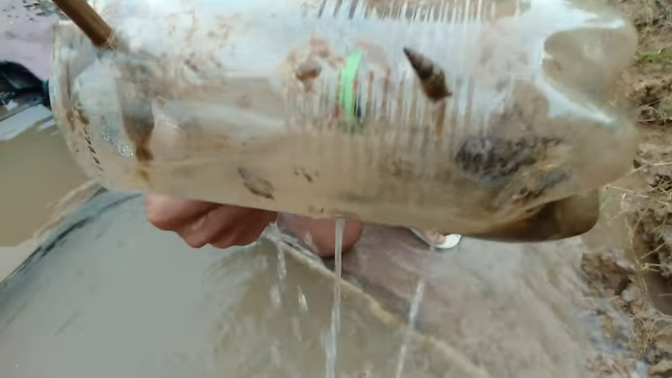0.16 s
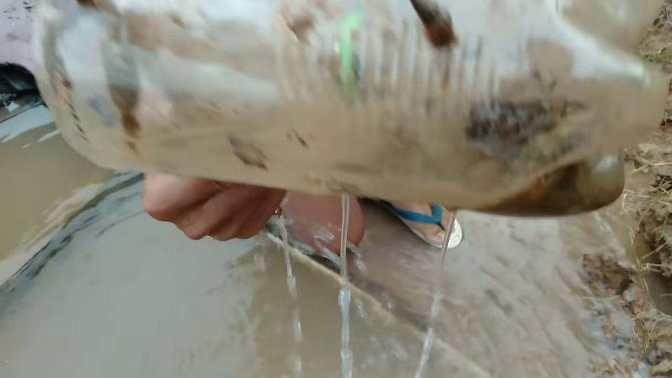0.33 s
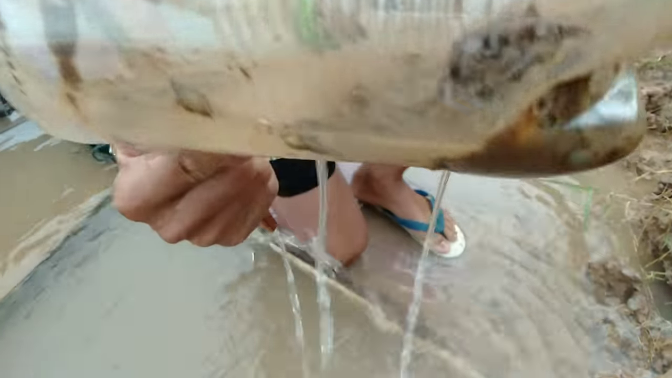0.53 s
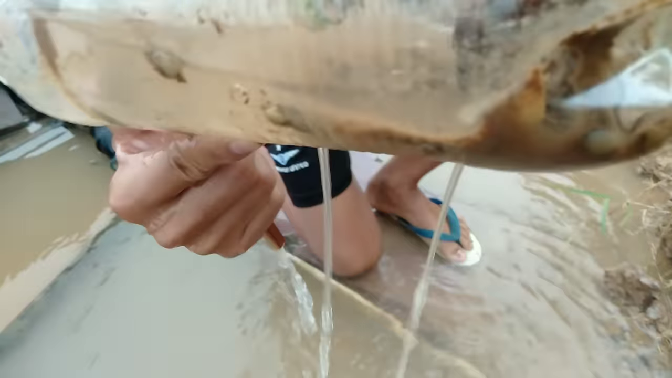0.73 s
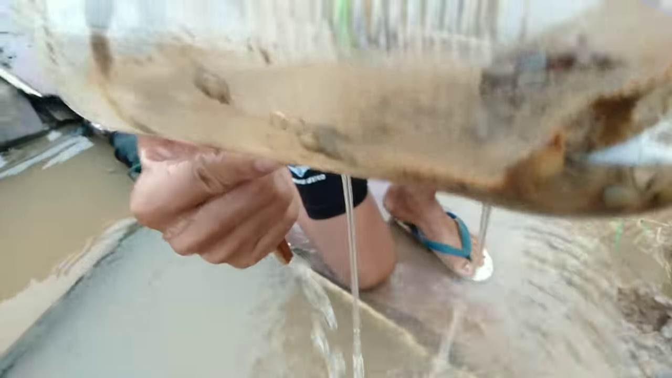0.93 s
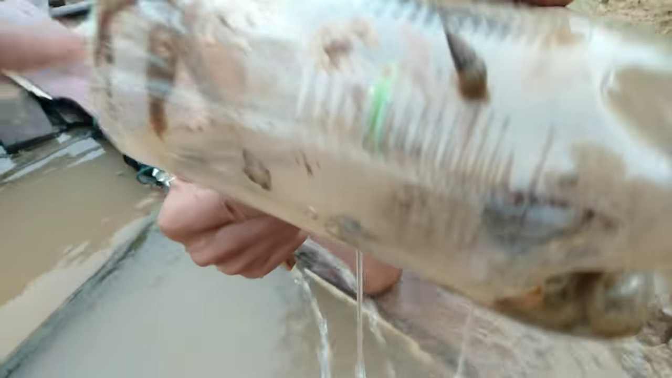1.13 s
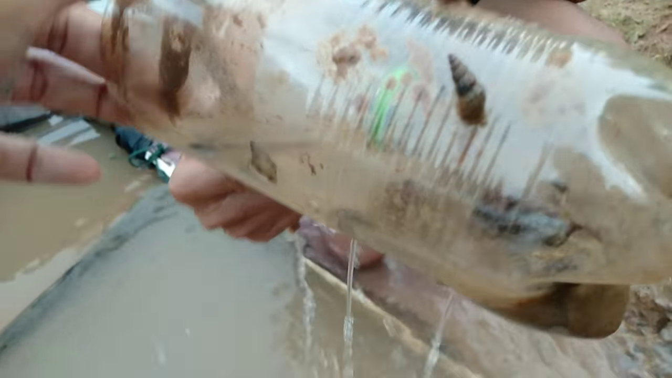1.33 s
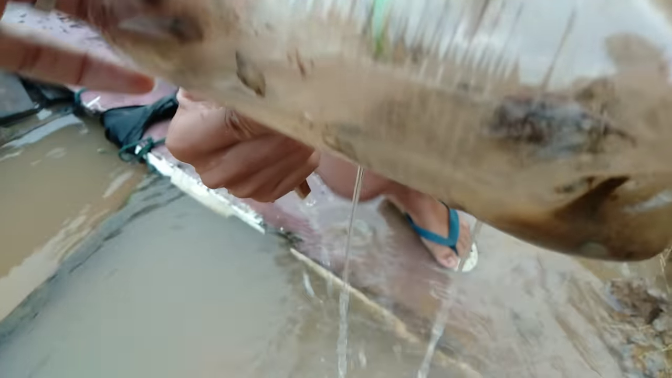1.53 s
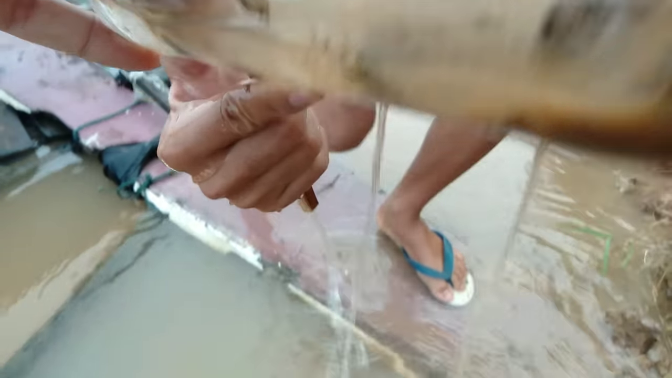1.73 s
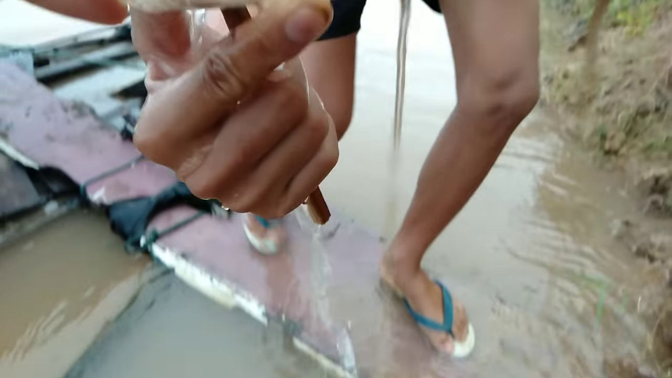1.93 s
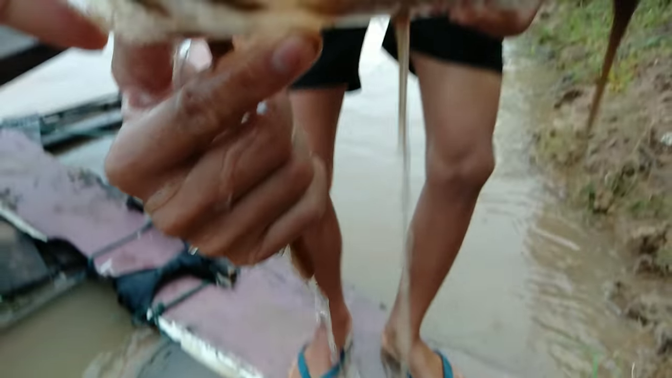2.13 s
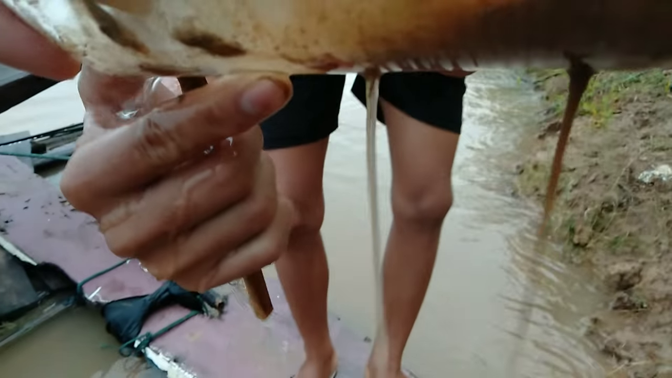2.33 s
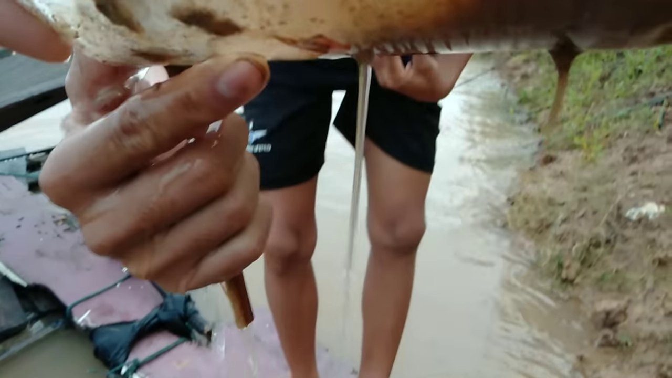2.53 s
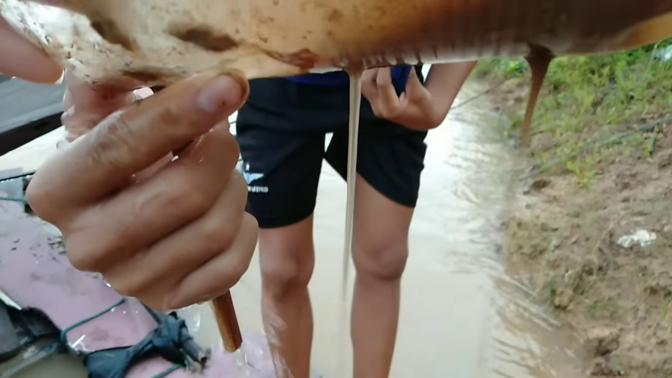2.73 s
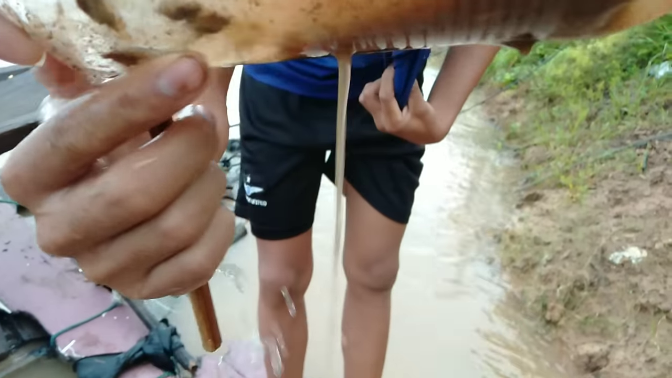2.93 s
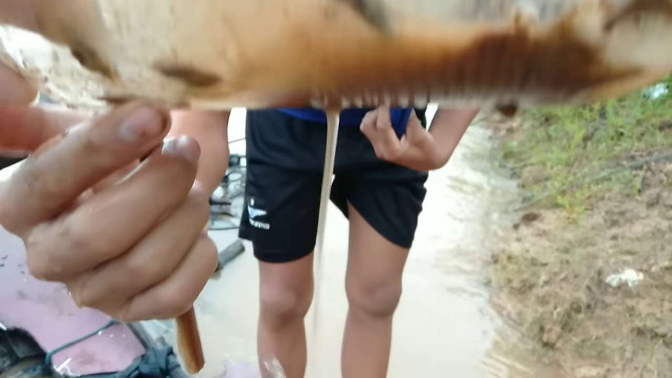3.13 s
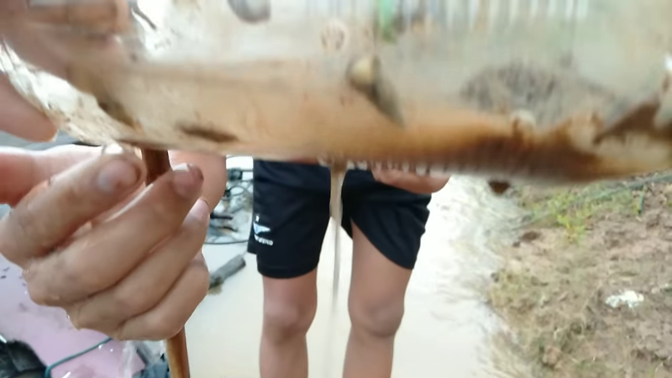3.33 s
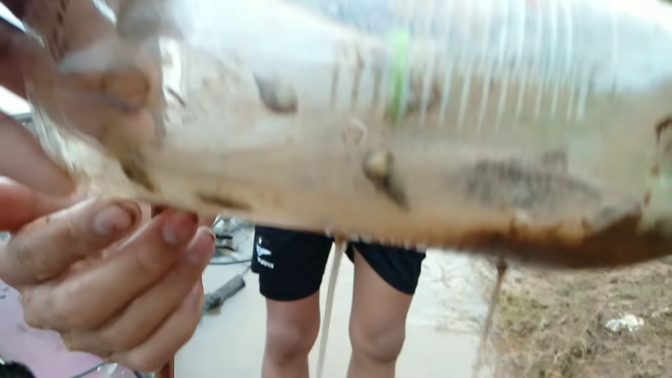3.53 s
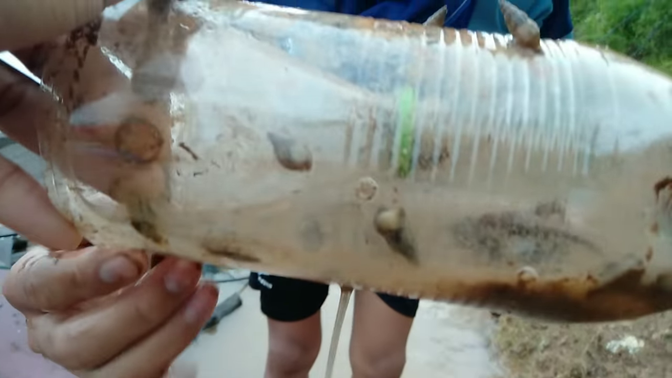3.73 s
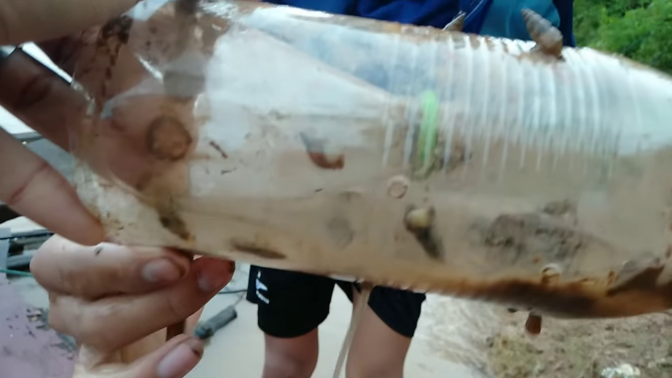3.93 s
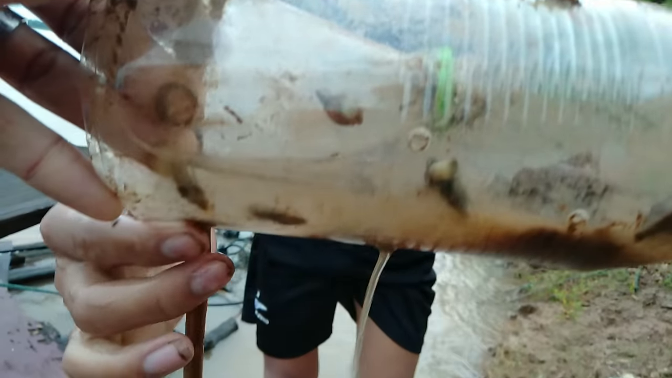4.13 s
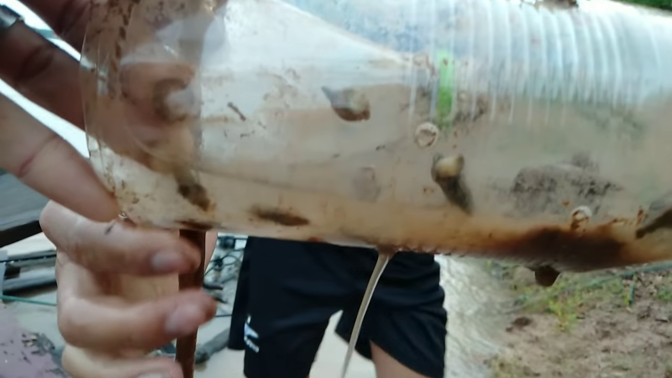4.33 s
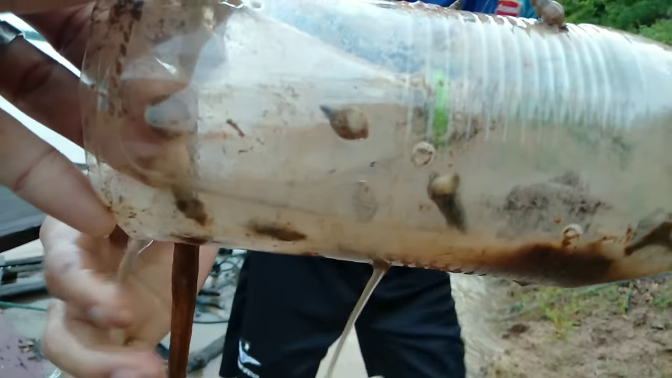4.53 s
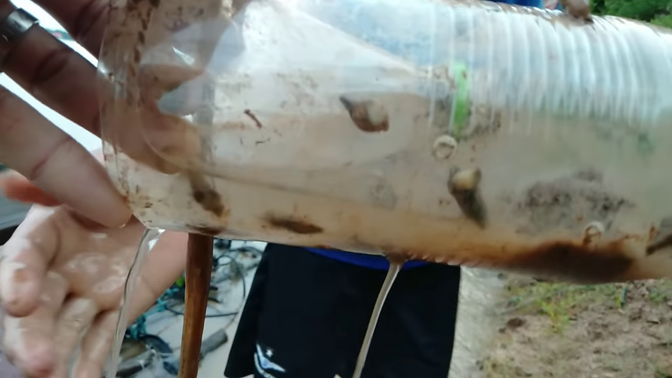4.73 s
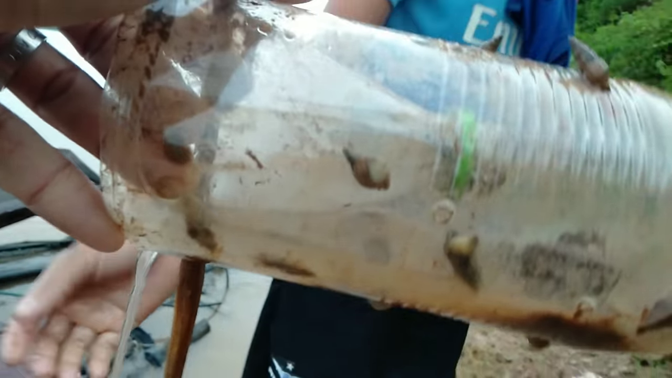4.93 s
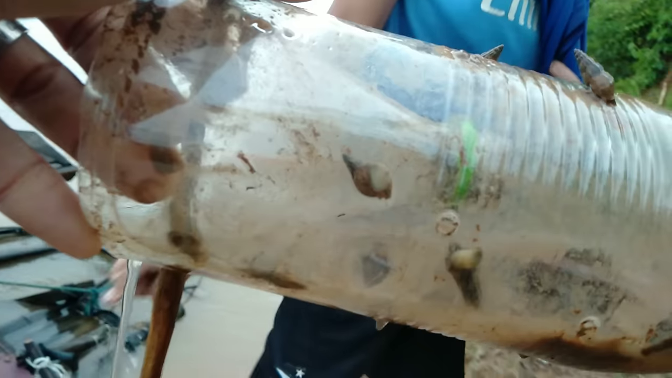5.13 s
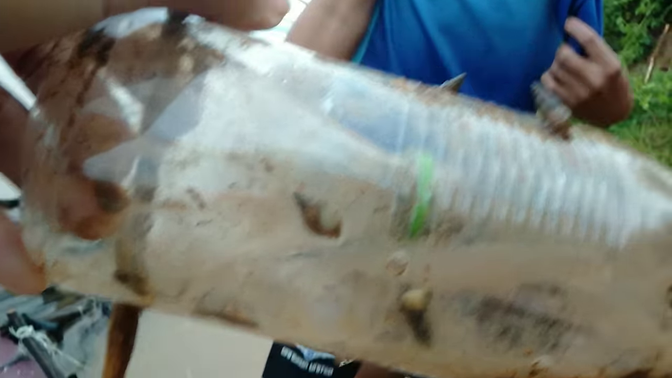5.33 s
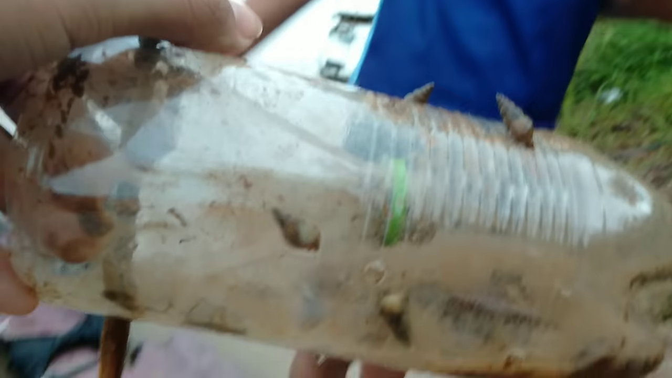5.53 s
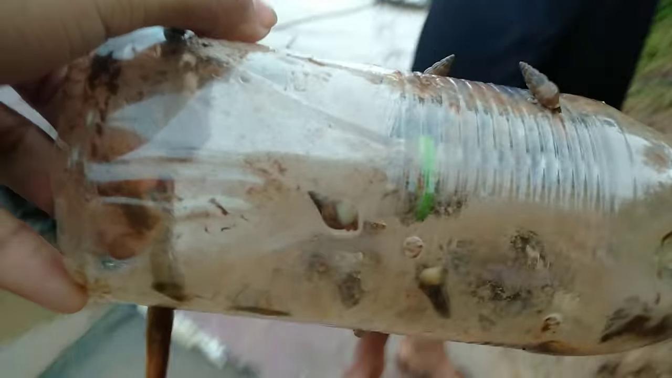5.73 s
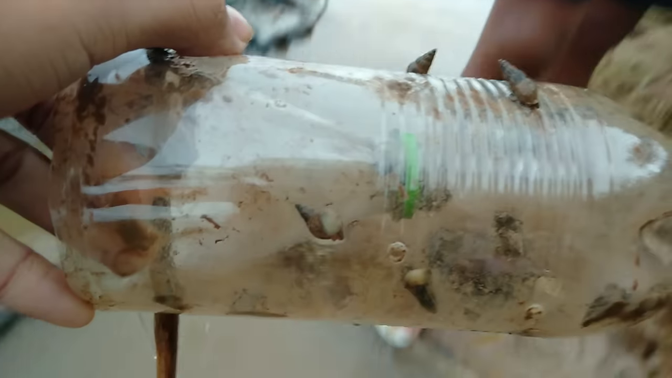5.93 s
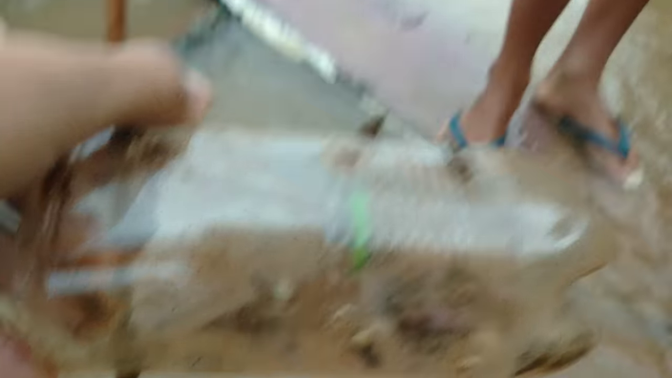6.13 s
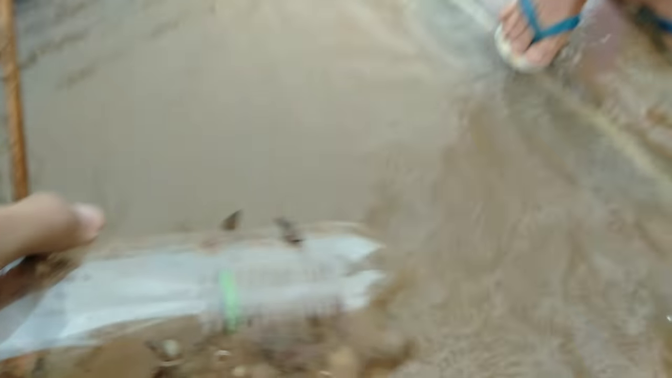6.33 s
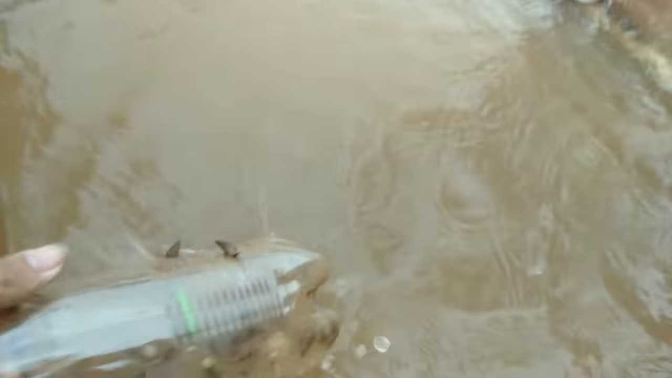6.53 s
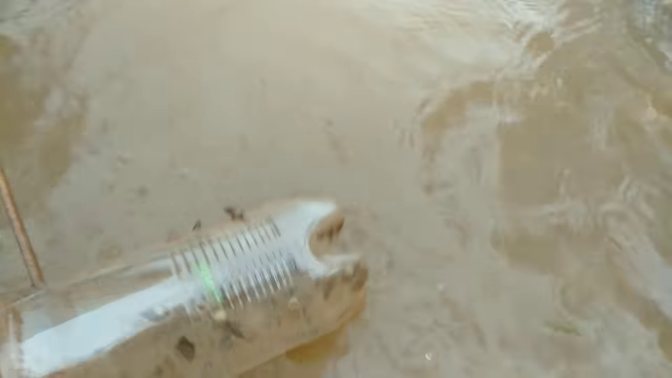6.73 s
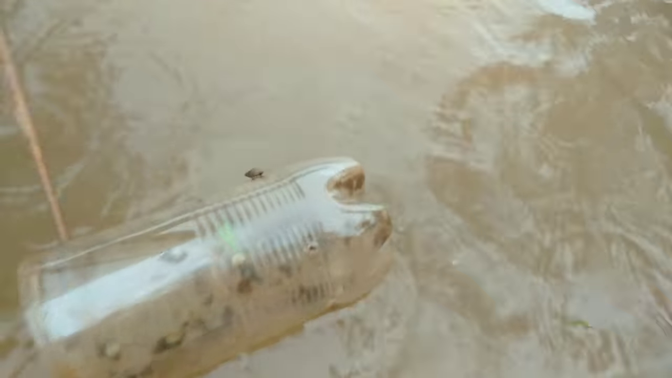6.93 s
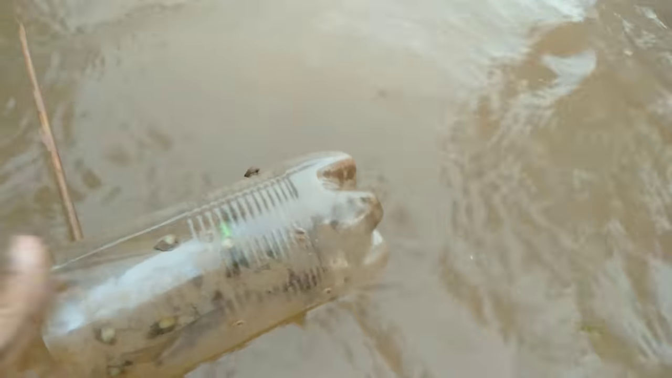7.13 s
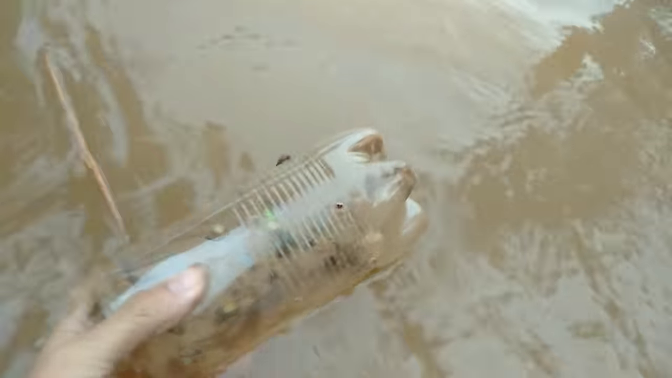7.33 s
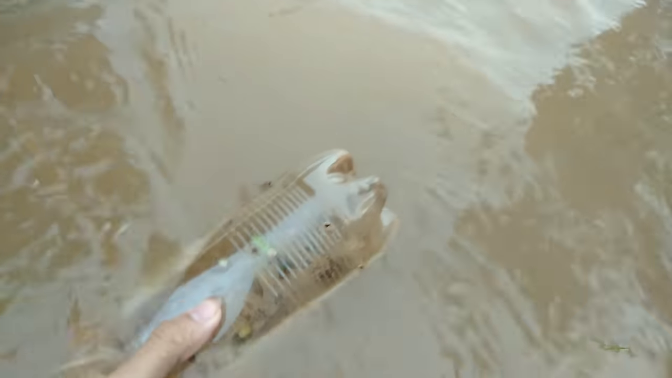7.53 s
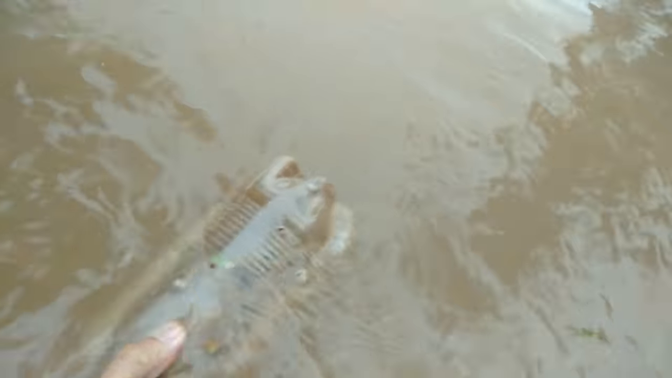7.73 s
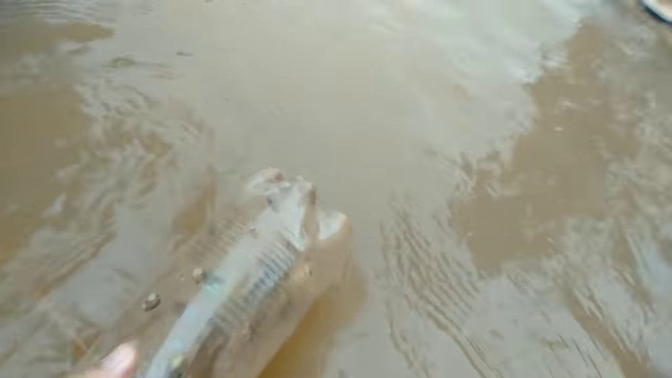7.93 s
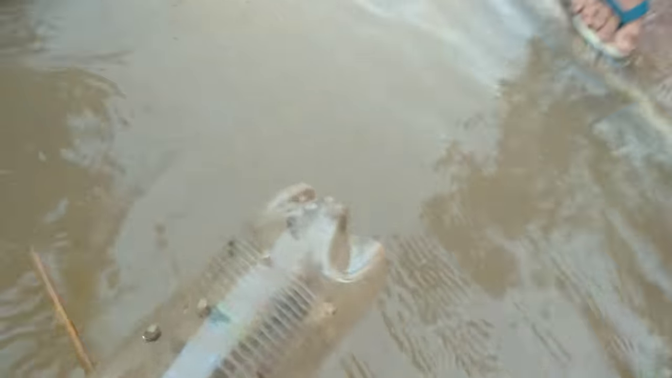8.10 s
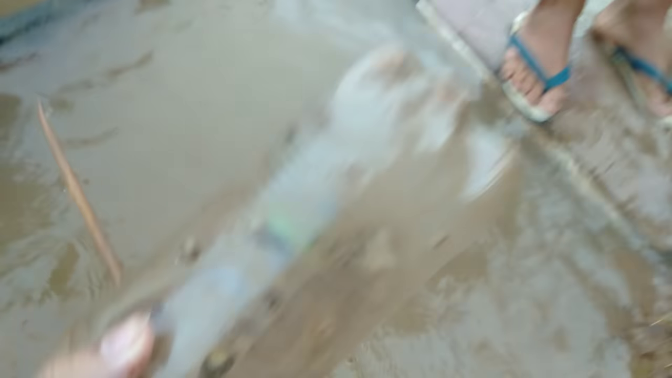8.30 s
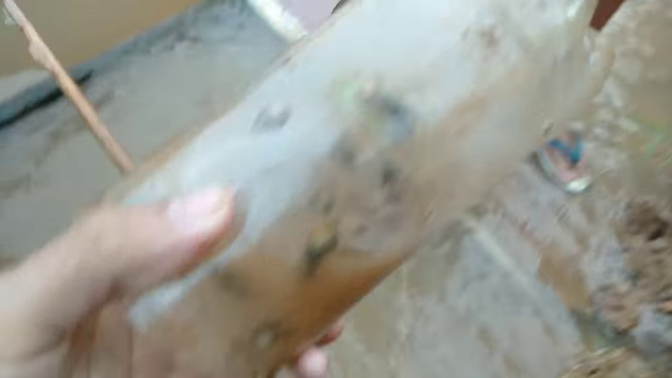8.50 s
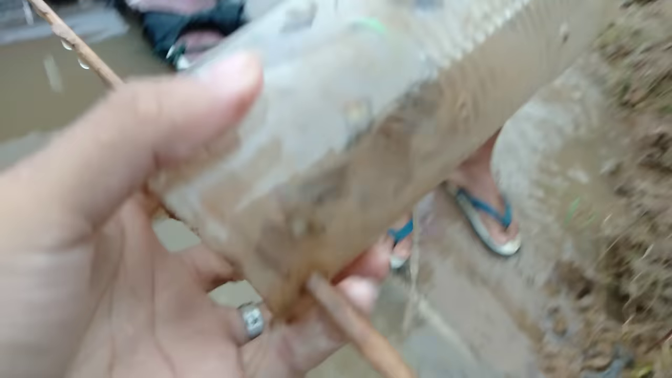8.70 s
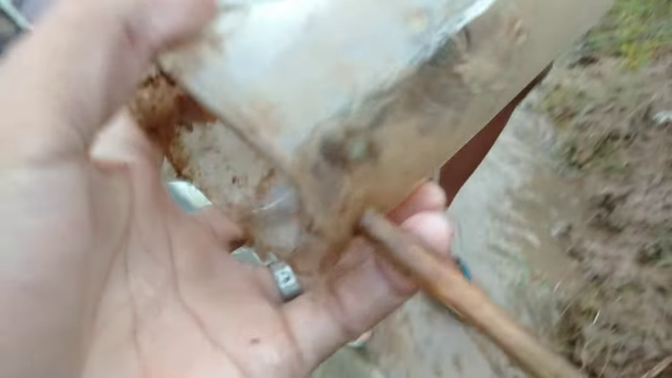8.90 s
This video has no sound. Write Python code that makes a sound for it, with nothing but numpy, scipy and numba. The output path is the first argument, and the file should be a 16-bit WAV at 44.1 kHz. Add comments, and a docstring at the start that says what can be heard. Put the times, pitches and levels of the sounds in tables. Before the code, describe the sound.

Very close to a phone microphone outdoors, water runs from a plastic bottle into a shallow river: bubbly gurgles, rising bloops, crisp drips and slaps. Hands knock the thin plastic softly. Small birds peep from about two seconds, with quick trills and a faint insect whine. The water thins to almost nothing near seven and a half seconds, then surges into brighter splashing. A distant engine putters quietly.

```python
"""Water runs from a lifted plastic bottle trap into a shallow river, close to a phone, from start to end:
air pockets ring as gliding sines, mostly rising; drops slap and tick as filtered noise bursts; air and engine hum.
From 1.2 s hands knock the bottle (low noise thuds); from about 2 s a bird peeps in falling sines and an insect
(narrow noise) comes up; a higher bird trills at 3.3 s and 8 s; thin whistles pass near 6 s; a far dove
calls at 7.1 s and 7.9 s; the spray ebbs near 7.6 s, then surges near 8.4 s."""
import sys
import numpy as np
from scipy import signal
from scipy.fft import rfft, irfft
from scipy.io import wavfile
from scipy.ndimage import uniform_filter1d
from numba import njit

SR = 44100
rng = np.random.default_rng(int(sys.argv[2]) if len(sys.argv) > 2 else 0)


def unload_wav(signal):
    """Save mono or channel-first audio to the path in sys.argv[1] as 16-bit WAV at rate SR, clipped to [-1, 1]."""
    wavfile.write(
        sys.argv[1],
        SR,
        np.round(np.clip(np.atleast_2d(signal).T, -1, 1) * 32767).astype(np.int16),
    )


def rack_gain(trim_db):
    """Turn a fader trim in dB into the linear factor to multiply a signal by."""
    fader = np.asarray(trim_db, float)
    return 10 ** (fader / 20)


N = 395121


@njit
def tones(n, rows, bend, fade, attack_rad):
    """Gliding sines: rows of (s, start Hz, end Hz, length s, gain), each swelling, fading and closing."""
    out = np.zeros(n)
    for s, start, end, length, gain in rows:
        first, phase = int(s * SR), 0.
        for i in range(min(int(length * SR), n - first)):
            u = i / (length * SR)
            phase += 2 * np.pi * start * (end / start) ** (u ** bend) / SR
            swell = min(1., phase / attack_rad) * min(1., 8 * (1 - u))
            out[first + i] += gain * swell * np.exp(-fade * u) * np.sin(phase)
    return out


def response(points, size=4096):
    """Causal (minimum-phase) impulse response with the colour of (Hz, dB) points."""
    hz, db = np.transpose(points)
    log_gain = np.interp(np.log(np.arange(size // 2 + 1) * SR / size + 1), np.log(hz), db) * np.log(10) / 20
    cepstrum = irfft(log_gain)
    cepstrum[1:size // 2] *= 2
    cepstrum[size // 2 + 1:] = 0
    return irfft(np.exp(rfft(cepstrum)))


def band(x, low_hz, high_hz):
    """Band-pass."""
    return signal.sosfilt(signal.butter(2, [low_hz, high_hz], "band", fs=SR, output="sos"), x)


def unit(x):
    """Scale to rms 1."""
    return x / np.sqrt(np.mean(x ** 2))


def walk(rate_per_s):
    """Slewed random levels that change rate_per_s times a second."""
    k = int(SR / rate_per_s)
    steps = np.repeat(rng.standard_normal(N // k + 1), k)
    return 0.707 * uniform_filter1d(uniform_filter1d(steps, k), k)[:N]


def curve(points):
    """Join (s, value) points by straight lines."""
    return np.interp(np.arange(N) / SR, *np.transpose(points))


def add(x, at, burst):
    """Mix a burst in at a sample."""
    x[at:at + len(burst)] += burst[:N - at]


# Colour of the air. Each row: frequency in Hz, relative density in dB per Hz.
AIR_COLOUR = [(20, 1.5), (50, -0.5), (110, 0.5), (200, -8.5), (400, -16.5), (1000, -18.5), (3000, -33),
              (5000, -42), (6200, -35.5), (10000, -27), (15000, -27.5)]


def air():
    """Smooth distant rumble and hiss: coloured noise with a slight sway."""
    level_db = -65
    noise = signal.fftconvolve(rng.standard_normal(N), response(AIR_COLOUR, size=16384))[:N]
    sway = rack_gain(.8 * walk(3))
    return rack_gain(level_db) * sway * unit(noise)


# Engine drones. Each row: mean frequency in Hz, mean peak level in dB.
DRONES = [(52, -72.5), (166, -76)]


def engine():
    """A slow single cylinder putters far away, band-passed pulses over two thin wavering drones."""
    firings_per_s, first_s, putter_db = 13.83, .029, -70
    exhaust_hz, width_hz = 96.6, 65
    s = np.arange(first_s, N / SR - .01, 1 / firings_per_s)
    late, size = rng.standard_normal((len(s), 2)).T
    pulses = np.zeros(N)
    pulses[((s + .002 * late) * SR).astype(int)] = -rack_gain(3.4 * size)
    putter = unit(band(pulses, exhaust_hz - width_hz / 2, exhaust_hz + width_hz / 2))
    drones = np.zeros(N)
    for hz, db in DRONES:
        gain = rack_gain(db + 3.8 * walk(1.64))
        path_hz = hz * (1 + 0.00746 * walk(1.493))
        drones += gain * np.sin(2 * np.pi * np.cumsum(path_hz) / SR)
    return rack_gain(putter_db) * putter + drones


# Insect. Each row: time in seconds, level in dB before the flicker.
INSECT_LEVEL = [(0, -89), (2.3, -73), (3.5, -73), (5.5, -73), (6.2, -73), (7.3, -88), (7.42, -75),
                (8.96, -76)]


def insect():
    """A thin band of noise that flickers in level."""
    hz, width_hz, flicker_per_s = 4630, 110, 45
    trill = unit(band(rng.standard_normal(N), hz - width_hz / 2, hz + width_hz / 2))
    flicker_db = 4 * walk(flicker_per_s)
    return rack_gain(curve(INSECT_LEVEL) + flicker_db) * trill


# Far dove. Each row: start in seconds, frequency in Hz, length in seconds, level in dB before flutter.
COOS = [(7.06, 640, .27, -70), (7.9, 640, .15, -72)]


def dove():
    """Tone rows of level coos."""
    return [(s, hz, hz, length_s, rack_gain(db)) for s, hz, length_s, db in COOS]


# Thin stray whistles. Each row: start in seconds, start Hz, end Hz, length in seconds, level in dB before flutter.
STRAY_WHISTLES = [(5.965, 15000, 14500, .075, -75), (6.065, 14800, 14200, .1, -75),
                  (6.15, 3950, 4270, 0.046, -58), (6.21, 4750, 4170, 0.036, -56)]


def whistles():
    """Tone rows of thin gliding whistles."""
    return [(*row, rack_gain(db)) for *row, db in STRAY_WHISTLES]


# Lower bird. Each row: start in seconds, start Hz, length in seconds, level in dB before flutter.
PEEP_NOTES = [(2.153, 3170, 0.038, -52), (2.227, 3090, 0.035, -47), (2.283, 3330, 0.028, -61),
              (2.346, 3370, 0.056, -55), (2.425, 3320, 0.035, -48.5), (2.742, 3360, 0.032, -47),
              (2.812, 3520, 0.047, -57), (3.178, 3430, 0.064, -59), (3.523, 3290, 0.058, -53),
              (3.58, 3420, 0.082, -54), (3.895, 3380, .035, -54), (3.963, 3320, 0.064, -54),
              (4.577, 3100, 0.047, -48), (5.058, 3460, 0.095, -57), (5.365, 3430, 0.03, -48),
              (5.453, 3470, 0.061, -59), (6.065, 3290, 0.078, -58.5), (6.131, 3370, 0.063, -51),
              (6.215, 3200, 0.063, -51), (6.598, 3380, 0.033, -53), (6.99, 3400, 0.036, -51),
              (7.246, 3300, 0.027, -65), (7.29, 3400, 0.04, -56), (7.363, 3380, 0.063, -55.5),
              (7.465, 3100, 0.048, -50.5), (7.539, 3170, 0.04, -54), (7.727, 3270, 0.035, -63),
              (7.805, 3280, 0.03, -52), (7.892, 3330, .035, -53)]


def peeps():
    """Tone rows of single peeps, falling at a constant log-pitch rate."""
    fall_per_s = -3.4  # natural log of pitch
    return [(s, hz, hz * np.exp(fall_per_s * length_s), length_s, rack_gain(db)) for s, hz, length_s, db in PEEP_NOTES]


# Higher bird. Each row: start in seconds, length in seconds, first chip's start Hz, its level in dB before flutter.
TRILL_NOTES = [(3.278, .16, 4980, -49), (3.558, .12, 5100, -45.5), (8.034, .12, 5250, -45),
               (8.277, .07, 5260, -47.5)]


def trills():
    """Tone rows of evenly spaced falling chips; each chip starts higher and louder than the last."""
    gap_s, chip_s, fall_per_s = .041, .021, -11  # fall in natural log of pitch
    climb_hz, swell_db = 62, 3  # from one chip to the next
    rows = []
    for s, length_s, first_hz, db in TRILL_NOTES:
        for k in range(round(length_s / gap_s)):
            hz = first_hz + k * climb_hz
            rows.append((s + k * gap_s, hz, hz * np.exp(fall_per_s * chip_s), chip_s, rack_gain(db + k * swell_db)))
    return rows


# Echoes from bank and water. Each row: delay in seconds, level in dB.
ECHOES = [(.0043, -11), (.0095, -13), (.017, -14), (.031, -13)]


def birds():
    """Near-sine notes and whistles, fluttering, smeared by echoes from the bank and the water."""
    rows = np.array(peeps() + trills() + dove() + whistles())
    flutter = rack_gain(8 * walk(150) - 1.5)
    direct = tones(N, rows, 0.86, 0.3, 180.0) * flutter
    return direct + sum(rack_gain(db) * np.roll(direct, int(s * SR)) for s, db in ECHOES)


# Hands on the bottle. Each row: time in seconds, peak in dB, thud centre in Hz.
HAND_KNOCKS = [(1.171, -49.5, 250), (1.285, -54, 250), (1.368, -47, 248), (2.874, -54, 250),
               (4.653, -41.5, 404), (6.548, -43.5, 332), (6.738, -44.5, 220), (7.558, -40.5, 210)]


def knocks():
    """The thin wall gives a short low thud: decaying band-passed noise."""
    edge_ratio = 2.4  # band edges to centre
    out, t = np.zeros(N), np.arange(2048) / SR
    for (s, db, hz), noise in zip(HAND_KNOCKS, rng.standard_normal((len(HAND_KNOCKS), 2048))):
        thud = band(noise * np.exp(-t / 0.0078), hz / edge_ratio, hz * edge_ratio)
        add(out, int(s * SR), rack_gain(db) * thud / np.abs(thud).max())
    return out


def clicks(rate_per_s, spread_db, length_s):
    """Scattered short noise bursts of bounded, uneven size."""
    size_db = spread_db * np.minimum(rng.exponential(size=N), np.e)
    drops = (rng.random(N) < rate_per_s / SR) * rack_gain(size_db)
    envelope = signal.lfilter([1], [1, -np.exp(-1 / (length_s * SR))], drops)
    return envelope * rng.standard_normal(N)


def plinks(when_s, hz, gain, few, many, rise):
    """Tiny bubbles that ring from few to few + many cycles and climb a little."""
    cycles, climb = rng.random((len(when_s), 2)).T
    length_s = (few + many * cycles ** 2) / hz
    rows = np.transpose([when_s, hz, hz * (1 + rise * climb ** 2), length_s, gain])
    return tones(N, rows, 1.135, 0.36, 6.8)


# Flow of water. Each row: time in seconds, spray control level in dB, gurgle above the spray in dB.
FLOW = [(0, -53.5, 1), (.7, -53, -12.5), (.9, -52.5, -7.5), (1.39, -47.5, -6.5), (1.72, -51.5, -6.5),
        (2.49, -57, -2.5), (2.87, -54, -5.5), (4.26, -56.5, -27.5), (4.52, -59, 5), (4.64, -51, -10.5),
        (5.11, -56.5, -13.5), (5.47, -52, -2.5), (5.95, -62.5, -16.5), (6.35, -60.5, -28),
        (6.74, -54.5, -2), (7.26, -65.5, -5.5), (7.61, -73, -12.5), (7.91, -56.5, -4), (8.44, -46, -30),
        (8.7, -49.5, -30), (8.86, -58, -30)]


def flow_db(t):
    """Levels of spray and gurgle at times t."""
    s, spray_db, gurgle_db = np.transpose(FLOW)
    return np.interp(t, s, spray_db), np.interp(t, s, gurgle_db)


# Drop colour, also used by slaps. Each row: frequency in Hz, relative density in dB per Hz.
DROP_COLOUR = [(250, -59), (450, -40), (600, 1.5), (1200, 4.5), (2500, 1.5), (4800, 7), (6300, -10.5),
               (9500, -7), (11500, -21), (15500, -24)]
# Drops of different size tick in different bands; slaps use the last. Each row: low edge in Hz, high edge in Hz.
DROP_BANDS = [(700, 2000), (1800, 3600), (3200, 5600), (6200, 10500), (10500, 15000)]
# Ticks, one row per drop band. Each row: mean rate per second, level in dB relative to the flow.
BAND_TICKS = [(39.9, -8), (60, -16), (69.7, -8), (70, -18.5), (130, -15.5)]


def spray():
    """Countless small drops in clusters: ticks, plinks, many deeper gurgles and a faint hiss."""
    t = np.arange(N) / SR
    level_db, gurgle_db = flow_db(t)
    flow = rack_gain(level_db + 5 * np.tanh(walk(22)))
    ticks = np.zeros(N)
    for (low_hz, high_hz), (rate_per_s, db) in zip(DROP_BANDS, BAND_TICKS):
        ticks += rack_gain(db) * unit(band(clicks(rate_per_s, 6.0, 0.0031), low_hz, high_hz))
    hiss = unit(signal.fftconvolve(rng.standard_normal(N), response(DROP_COLOUR))[:N])
    when, size, loud = rng.random((4500, 3)).T
    fizz = unit(plinks(when * t[-1], 1700 * 3.2 ** size, rack_gain(17 * loud ** 3), 3, 18, 0.3))
    when, size, loud = rng.random((700, 3)).T
    gurgle = unit(plinks(when * t[-1], 520 * 3.076 ** size, rack_gain(12.0 * loud), 5.7, 12.5, 1.0))
    return flow * (ticks + rack_gain(-10.5) * hiss + rack_gain(-4) * fizz + rack_gain(gurgle_db) * gurgle)


# Slaps at set times. Each row: time in seconds, level in dB before the part gains, ring start Hz,
# treble relative to that level in dB.
SLAPS = [(.0139, -32, 2950, -26), (.0798, -30, 4340, -17), (.1534, -30, 2900, -20), (.17, -33, 4800, -5),
         (.2573, -31.5, 1520, -21), (.29, -30, 1640, -30), (.3474, -29.5, 3500, -38),
         (.5064, -27.5, 4300, -12), (.227, -31, 3860, -28), (.4756, -33, 3140, -24),
         (.5604, -31.5, 2440, -34), (.7018, -29.5, 4670, -34), (.8117, -28.5, 2170, -13),
         (.8718, -30, 4900, -16), (.9348, -34.5, 1630, -32), (1.0331, -42, 4550, 0),
         (1.1638, -32.5, 2830, -19), (1.2106, -35.5, 2320, -30), (1.2186, -27.5, 4870, -31),
         (1.2748, -32, 1850, -7), (1.3803, -33.5, 4150, -30), (1.4092, -32.5, 2050, -30),
         (1.4411, -38, 1570, -22), (1.4764, -35, 4300, -5), (1.461, -38, 2200, 8), (1.592, -28, 4500, -10),
         (1.9167, -27.5, 1305, -27), (1.958, -25, 3640, -17), (2.022, -34.5, 2840, -29),
         (2.367, -32.5, 1810, -34), (2.4703, -33.5, 2590, -25), (2.5135, -32.5, 5130, -17),
         (2.6584, -36.5, 5200, -7.5), (2.8784, -32.5, 3880, -24), (2.9678, -28.5, 3570, -34),
         (3.0325, -28.5, 5300, -15), (3.1264, -27.5, 1880, -17), (3.1594, -30, 1460, -33),
         (3.3207, -34, 2080, -10), (3.5052, -23.5, 4470, -2.5), (3.6991, -31.5, 2310, -9),
         (3.7882, -33.5, 4140, 0), (3.8354, -29, 4100, -10), (3.8804, -34, 2720, -5.5),
         (4.0843, -26.5, 3550, -16), (4.1005, -31.5, 3500, -10), (4.1503, -36, 1490, -14),
         (4.203, -30.5, 3960, -16), (4.33, -44, 1820, 1), (4.4119, -41.5, 1600, -30),
         (4.5052, -34, 2960, -35), (4.7745, -34, 4250, -21), (4.535, -29.5, 3850, -35),
         (4.6632, -27.5, 3050, -32), (4.6818, -31, 4280, -18), (4.6954, -28.5, 1810, -19),
         (4.7115, -27, 2350, -15), (4.7416, -26.5, 4220, -18), (4.789, -35.5, 2300, -7),
         (4.828, -44, 1490, -2), (5.0086, -33.5, 4630, -1), (5.1264, -29.5, 2230, -11),
         (5.223, -41, 3180, -3), (5.3133, -20.5, 3470, -44), (5.3433, -36, 3200, -9),
         (5.4874, -36, 3330, -11), (5.6116, -36.5, 1290, -12), (5.3724, -30, 3020, -17),
         (5.5331, -33.5, 2220, -13), (5.5542, -28.5, 3100, -13), (5.639, -32, 4270, 3),
         (5.7905, -38, 2540, -13), (5.8216, -38, 1780, -14), (5.8796, -35.5, 2160, -27),
         (5.9068, -24, 5100, -25), (6.0591, -50.5, 4580, 9.5), (6.1394, -45, 2290, 0),
         (6.1948, -38.5, 3820, -5), (6.22, -40.5, 1630, -20), (6.2456, -29, 1450, -21),
         (6.2594, -35, 4670, -11), (6.3001, -44.5, 5040, -2.5), (6.4323, -36, 2540, -23),
         (6.453, -39.5, 1740, -5), (6.5488, -21.5, 3780, -16), (6.5616, -23.5, 4700, -3.5),
         (6.7252, -28, 3450, -15), (6.7334, -25.5, 3150, -19), (6.7638, -27.5, 4130, -5),
         (6.8643, -37, 2270, -7), (6.884, -38, 1800, -6), (6.9, -26.5, 1900, -8.5),
         (6.9233, -22.5, 2390, -10.5), (7.028, -39, 980, -28), (7.0904, -31, 1443, -15),
         (7.12, -29.5, 2850, -16), (7.2299, -34, 1535, -37), (7.561, -30, 1570, -7),
         (7.5792, -32, 2290, -2.5), (7.678, -39, 4150, -16), (7.734, -34.5, 3820, -36),
         (7.787, -35.5, 2200, -30), (7.8504, -27, 3560, -44), (7.8845, -33, 1660, -40),
         (7.9359, -41, 4800, -30), (7.9984, -30, 1850, -33), (8.0069, -29.5, 1280, -13),
         (8.0257, -31, 4730, -31), (8.1559, -45, 2460, -30), (8.2186, -24.5, 2540, -29),
         (8.2366, -24.5, 3050, -19.5), (8.3572, -17, 4650, -19), (8.4117, -27, 2820, -8),
         (8.44, -25, 5060, -16), (8.4557, -28.5, 2900, 1.5), (8.488, -21.5, 3830, -37),
         (8.5022, -25, 3630, -7), (8.5798, -35, 1810, -21), (8.6185, -28.5, 5400, -17),
         (8.6946, -27, 3280, -8.5), (8.7213, -19.5, 2660, -32), (8.728, -21.5, 2840, -18),
         (8.8223, -31, 5600, -17), (8.8745, -33, 3820, -2.5), (8.925, -26.5, 4070, -34)]


def slaps():
    """Each slap is a sharp tick, a short ring of the crater and a scatter of droplets falling back."""
    scattered_db = 21.5  # strongest scattered slap, above the spray level
    width_oct, skirt_db = .5, -17  # tick noise gathers around the ring pitch
    when, loud, size, bright = rng.random((28, 4)).T
    s = when * N / SR
    scattered = [s, flow_db(s)[0] + scattered_db - 6 * loud, 1300 * 4.04 ** size, -8 - 24 * bright]
    s, db, hz, treble_db = np.vstack([SLAPS, np.transpose(scattered)]).T

    tick, treble = np.zeros((2, N))
    t = np.arange(1536) / SR
    octaves = np.arange(-4, 4.1, .25)
    focus_db = 20 * np.log10(np.exp(-(octaves / width_oct) ** 2 / 2) + rack_gain(skirt_db))
    tick_decay = np.exp(-t / 0.0005) + rack_gain(-9) * np.exp(-t / 0.01)
    treble_decay = np.exp(-t / 0.00045) + rack_gain(-14.0) * np.exp(-t / 0.0084)
    noises = rng.standard_normal((len(s), 2, len(t)))
    for at, gain, top, f, noise in zip((s * SR).astype(int), rack_gain(db), rack_gain(treble_db), hz, noises):
        focus = response(np.transpose([f * 2 ** octaves, focus_db]), size=256)
        burst = np.convolve(noise[0] * tick_decay, focus)[:len(t)]
        add(tick, at, gain * burst / np.abs(burst).max())
        add(treble, at, gain * top * noise[1] * treble_decay)
    colour = response(DROP_COLOUR)
    tick = band(signal.fftconvolve(tick, colour / np.linalg.norm(colour))[:N], 710, 5860)
    treble = band(treble, 7500, 10300) + rack_gain(-3.5) * band(treble, *DROP_BANDS[-1])

    ring = tones(N, np.transpose([s, hz, 1.053 * hz, 12 / hz, rack_gain(db)]), 0.5, 1.74, 3.45)

    late, spread, size = np.moveaxis(rng.random((len(s), 16, 3)), 2, 0)
    delay_s = 0.028 * late ** 1.7
    gain = rack_gain(db[:, None] - 18.0 - 3.4 * size) * np.exp(-delay_s / 0.0047)
    pitch_hz = np.clip(hz[:, None] * np.exp(1.403 * (spread - .5)), 600, 5600)
    droplets = plinks((s[:, None] + delay_s).ravel(), pitch_hz.ravel(), gain.ravel(), 3.05, 13.5, 0.24)
    return rack_gain(-4.5) * tick + rack_gain(7.0) * treble + rack_gain(-3.5) * ring + droplets


# Air pockets at set times. Each row: start in seconds, start Hz, end Hz, length in seconds,
# level in dB before shaking.
POCKETS = [(.081, 615, 720, 0.13, -52), (.252, 756, 800, 0.021, -47), (.574, 732, 1240, 0.076, -47),
           (.679, 593, 640, 0.07, -52), (.936, 589, 624, 0.034, -48), (.116, 650, 1260, 0.024, -39),
           (.157, 893, 1310, 0.028, -36), (.183, 740, 1450, 0.023, -36.5), (.378, 640, 900, 0.01, -46.5),
           (.415, 1110, 1623, 0.0062, -36.5), (.526, 691, 1480, 0.035, -41.5),
           (.6482, 943, 1880, 0.043, -33.5), (.6495, 653, 1310, 0.04, -39.5), (.7366, 628, 805, 0.051, -39),
           (.811, 960, 1076, 0.013, -39), (.879, 1150, 1620, 0.0075, -35.5),
           (.9622, 1020, 990, 0.021, -39.5), (.965, 715, 915, 0.032, -37), (1.008, 760, 800, 0.032, -45),
           (1.034, 786, 760, 0.016, -39), (1.0547, 650, 960, 0.034, -34.5),
           (1.0878, 680, 780, 0.036, -41.5), (1.173, 640, 840, 0.023, -46), (1.214, 700, 730, 0.074, -54.5),
           (1.269, 760, 855, 0.087, -46.5), (1.2729, 1060, 1301, 0.0067, -41),
           (1.318, 1330, 2100, 0.013, -44), (1.3282, 670, 776, 0.011, -46), (1.354, 964, 1460, 0.029, -39),
           (1.3902, 580, 685, 0.04, -45.5), (1.4339, 605, 810, 0.026, -49), (1.456, 640, 660, 0.031, -44),
           (1.579, 693, 750, 0.022, -43), (1.6, 720, 1100, 0.036, -52), (1.51, 630, 796, 0.084, -52),
           (2.63, 680, 715, 0.023, -59), (1.6554, 945, 970, 0.013, -39), (1.6557, 630, 644, 0.037, -47),
           (1.704, 797, 830, 0.017, -37), (1.923, 652, 870, 0.038, -47), (1.9981, 627, 630, 0.037, -34),
           (2.022, 593, 1270, 0.035, -43.5), (2.105, 737, 1210, 0.035, -39.5),
           (2.14, 635, 1120, 0.039, -43), (2.1703, 647, 1320, 0.064, -42.5),
           (2.235, 629, 1290, 0.041, -44.5), (2.274, 616, 1400, 0.076, -43), (2.3722, 850, 980, 0.023, -40),
           (2.489, 1100, 1150, 0.01, -42), (2.518, 684, 1100, 0.067, -62), (2.587, 483, 1880, 0.027, -50.5),
           (2.678, 865, 1701, 0.019, -45), (2.723, 910, 1190, 0.011, -38), (2.7495, 805, 1630, 0.027, -38),
           (2.7746, 581, 740, 0.071, -46.5), (2.826, 818, 960, 0.05, -48.5),
           (3.1462, 675, 1070, 0.017, -40.5), (3.3176, 920, 1080, 0.017, -40.5),
           (3.229, 1030, 980, 0.021, -46.5), (3.265, 593, 1020, 0.046, -53.5),
           (3.5933, 860, 910, 0.033, -49), (3.668, 960, 1690, 0.0078, -42), (3.871, 448, 700, 0.13, -57),
           (3.937, 654, 680, 0.0051, -36.5), (3.995, 704, 730, 0.039, -49),
           (4.237, 920, 1380, 0.0092, -40.5), (4.28, 1040, 1152, 0.01, -37.5),
           (4.116, 955, 1010, 0.0043, -39), (4.432, 747, 1910, 0.016, -40),
           (4.478, 904, 3430, 0.024, -43.5), (4.591, 1210, 3200, 0.024, -38),
           (4.534, 572, 700, 0.045, -54.5), (4.708, 470, 557, 0.044, -53.5), (4.655, 616, 920, 0.011, -36),
           (4.6557, 1100, 1360, 0.033, -47), (4.945, 643, 800, 0.057, -43),
           (5.0634, 1060, 1113, 0.016, -44.5), (5.19, 529, 960, 0.076, -44.5),
           (5.272, 522, 563, 0.014, -46), (5.2874, 595, 1250, 0.017, -41), (5.856, 707, 846, 0.069, -44.5),
           (6.245, 875, 940, 0.0058, -27), (6.5472, 544, 761, 0.0076, -42),
           (6.5478, 1114, 1260, 0.026, -40.5), (6.554, 2520, 2720, 0.021, -37),
           (6.5713, 765, 1080, 0.0053, -34), (6.8116, 1480, 1456, 0.0069, -37),
           (6.8835, 1730, 1750, 0.011, -31), (6.9004, 692, 635, 0.023, -37.5),
           (6.917, 2280, 2300, 0.014, -31), (7.037, 622, 690, 0.041, -50.5), (7.058, 667, 2030, 0.041, -50),
           (7.5596, 850, 990, 0.0095, -39.5), (8.0077, 1255, 1700, 0.032, -38),
           (8.054, 1280, 1170, 0.023, -45.5), (8.121, 925, 890, 0.026, -50.5),
           (8.285, 780, 784, 0.043, -49), (8.2181, 2480, 2740, 0.01, -35), (8.4824, 645, 850, 0.0097, -33),
           (8.5374, 560, 1090, 0.053, -38.5), (8.627, 630, 1290, 0.03, -44.5),
           (8.7184, 1990, 3660, 0.016, -23), (8.764, 936, 1940, 0.034, -39)]


def bubbles():
    """A pocket starts at once, glides faster as it nears the surface, and wobbles in the moving water."""
    scattered_db = 11  # strongest scattered pocket, above the gurgle level
    when, size, climb, life, loud = rng.random((12, 5)).T
    s, hz = when * N / SR, 520 * 4.4 ** size
    end_hz = hz * (1.18 + 0.74 * climb)
    length_s = 0.011 + 0.034 * life ** 2
    level_db = sum(flow_db(s)) + scattered_db - 20.0 * loud
    rows = np.vstack([POCKETS, np.transpose([s, hz, end_hz, length_s, level_db])])
    rows[:, 4] = rack_gain(rows[:, 4])
    wobble = rack_gain(5 * walk(130))
    froth = 1 + .3 * walk(500)  # froth around a pocket shakes its level
    steady = tones(N, rows, 1.8, 1.1, 8) * wobble * froth
    # the heaving surface shifts the path (in samples), so the pitch trembles
    return np.interp(np.arange(N) + 9.0 * walk(70), np.arange(N), steady)


def nearby(x):
    """Short scattered reflections off the bottle, legs and water blur each drop."""
    t = np.arange(1500) / SR
    tail = rng.standard_normal(len(t)) * np.exp(-t / 0.0084) * (t > .001)
    return x + rack_gain(-13) * signal.fftconvolve(x, tail / np.linalg.norm(tail))[:N]


# Gain of the water's top treble. Each row: time in seconds, gain in dB.
TOP_TREBLE = [(0, -11), (.8, -0.5), (1.3, -7.5), (2.5, -0.5), (3.5, -11), (4.7, -5), (5.7, -9), (6.7, -10),
              (7.5, -24), (8.96, -7)]


def scene():
    """Everything meets at one microphone; the water's top treble follows its own level curve."""
    water = nearby(bubbles() + slaps() + spray())
    top = signal.sosfiltfilt(signal.butter(4, 11000, "high", fs=SR, output="sos"), water)
    water = water + top * (rack_gain(curve(TOP_TREBLE)) - 1)
    return (water + knocks() + birds() + insect() + air() + engine())[None]


def low_pass(x):
    """Removes everything above the highest recorded frequency."""
    return signal.sosfilt(signal.butter(12, 16500, fs=SR, output="sos"), x)


def record(dry):
    """The phone cuts the top above 15.5 kHz with a steep low-pass."""
    top_cut = signal.cheby1(10, .5, 15500, fs=SR, output="sos")
    mix = signal.sosfilt(top_cut, dry)
    return low_pass(mix)


dry = scene()
out = record(dry)
unload_wav(out)
```